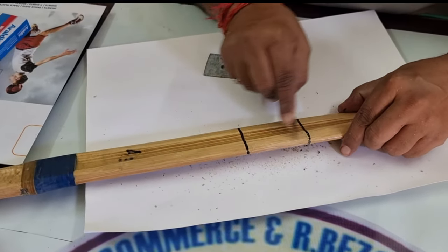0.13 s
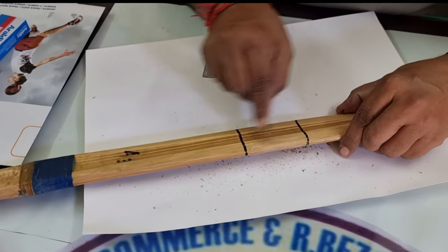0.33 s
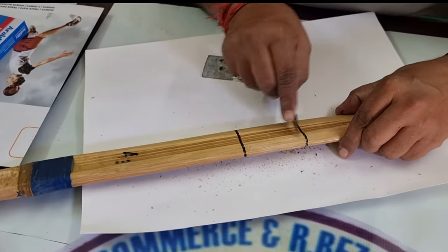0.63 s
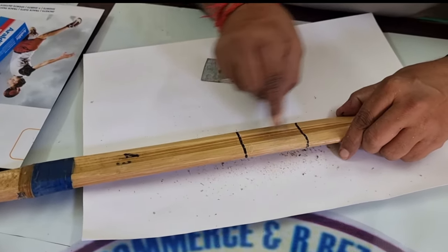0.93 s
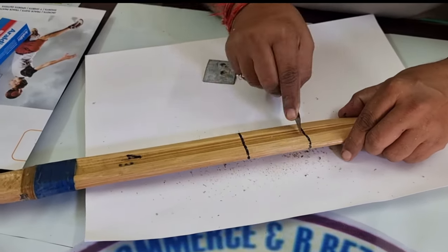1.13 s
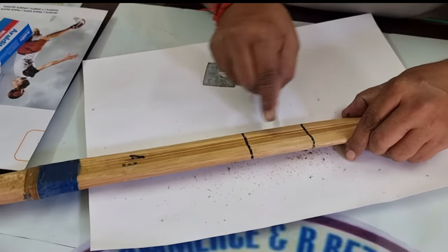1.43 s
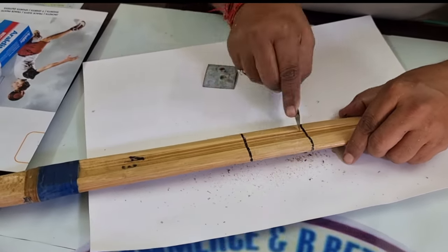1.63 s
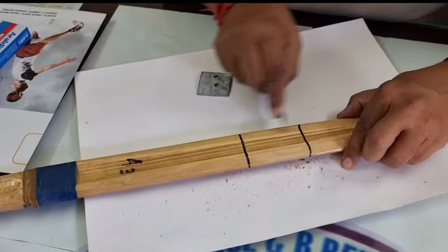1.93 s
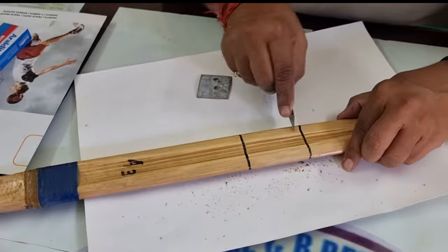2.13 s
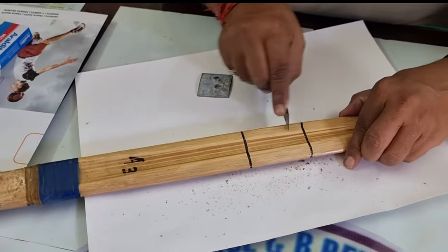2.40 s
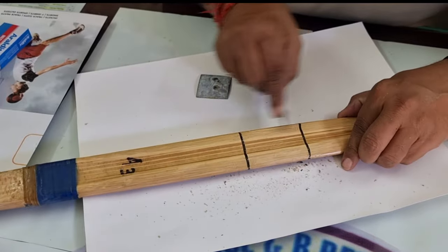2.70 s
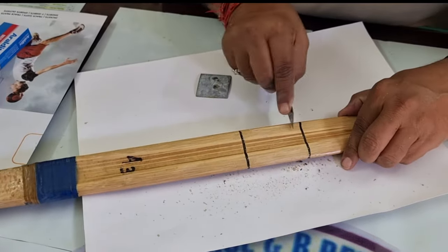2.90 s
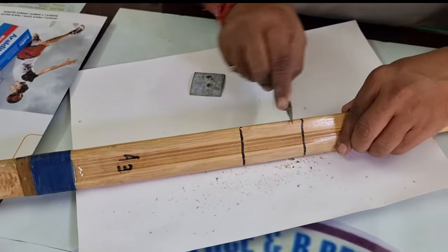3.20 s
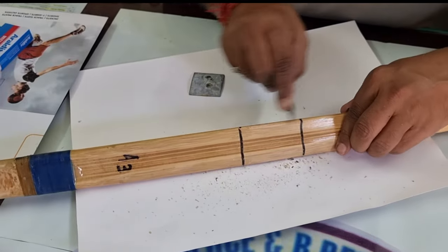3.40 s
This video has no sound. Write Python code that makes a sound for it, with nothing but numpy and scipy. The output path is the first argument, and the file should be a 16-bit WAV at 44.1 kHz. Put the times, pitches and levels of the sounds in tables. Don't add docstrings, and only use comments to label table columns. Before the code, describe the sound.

Close, dry rasping of a metal edge on bamboo, steady and rapid from start to end, each push stronger than the return, fading into light slides over faint room hiss and low desk rumble.

```python
import sys
import numpy as np
from scipy import signal
from scipy.fft import rfft, irfft
from scipy.io import wavfile
from scipy.ndimage import uniform_filter1d, minimum_filter1d

SR = 44100
rng = np.random.default_rng(int(sys.argv[2]) if len(sys.argv) > 2 else 0)


def ratio_of_db(decibels):
    return 10 ** (np.asarray(decibels, float) / 20)


def transcribe(u):
    v = np.clip(np.atleast_2d(u).T, -1, 1)
    q = np.round(v * 32767).astype(np.int16)
    wavfile.write(sys.argv[1], SR, q)


N = 156555

# freq_hz, level_db_per_hz
HUSH_SPECTRUM = [(25, -54), (55, -20.5), (152, -23.5), (243, -23), (359, -22.5), (2300, -23), (4420, -29.5),
                 (15500, -28.5)]
# start_s, length_s, flex_level_db, pressure_change_db, flex_pitch_hz
PUSHES = [(.098, 0.066, -41.5, 6.5, 2780), (.345, 0.062, -17, -4, 2790), (.589, 0.051, -18.5, 1, 2770),
          (.826, 0.065, -17.5, -1, 2740), (1.075, 0.056, -24, -1, 2780), (1.332, 0.052, -19.5, 8, 2833),
          (1.577, 0.047, -21, -2, 2780), (1.815, 0.069, -19, 16.5, 2680), (2.068, 0.067, -26.5, 10.5, 2735),
          (2.32, 0.07, -23.5, -8.5, 2900), (2.582, 0.057, -30, -4.5, 3000), (2.841, 0.056, -33, -1.5, 2940),
          (3.106, 0.045, -26.5, 13, 3115)]
PULLS = [(.022, 0.003, -41.5, -3, 2320), (.222, 0.058, -32, 18, 2301), (.478, 0.054, -34.5, 6, 2275),
         (.702, 0.07, -27.5, 9.5, 2380), (.955, 0.074, -36.5, -7.5, 2324), (1.168, 0.058, -44, 2, 2200),
         (1.452, 0.044, -41, 6.5, 2530), (1.68, 0.072, -32, 2, 2370), (1.927, 0.07, -32.5, 14.5, 2395),
         (2.212, 0.049, -36, 11.5, 2460), (2.448, 0.061, -25.5, 0, 2380), (2.706, 0.059, -31.5, 17.5, 2430),
         (2.965, 0.062, -44, 14.5, 2460), (3.212, 0.074, -37, 18, 2370)]
SLIDES = [
    (3.357, 0.065, -54, 3.5, 2460),
    (3.46, 0.035, -58, 2.9, 2500),
    (3.515, 0.049, -51.5, 19, 2370),
]
# thump_db, knock_db, tip_db, edge_db, thump_pitch_hz
PUSH_GRIPS = [(1.5, -2.5, -9.5, -2, 530), (-23.5, -12, -1, -5, 490), (-25, -16.5, -2.5, -5, 481),
              (-21, -15, -6, -11, 476), (-21, -9, -11.5, -5.5, 515), (-32.5, -8.5, -7, -6, 360),
              (-26, -10, -4, -2.5, 500), (-20, -7, -2, -4, 473), (-18.5, -6.5, 3.5, 1.5, 550),
              (-21, -9.5, 0.5, -3, 460), (-18.5, -2.5, -1, -2, 480), (-15.5, -3.5, -3.5, 3, 453),
              (-21, -13, -19.5, 0, 418)]
PULL_GRIPS = [(-17, -28, -16, -10, 510), (-24.5, -36.5, -7, -4, 410), (-32.5, -18.5, 0, -0.5, 2000),
              (-25.5, -26, -4, -8, 570), (-11.5, -36, -3, -3.5, 1800), (-22, -15, -5, -4.5, 1700),
              (-37, -16, -11, -31, 2000), (-34, -15.5, -7.5, -8, 280), (-25, -18.5, -11, -9.5, 240),
              (-46, -24, -3.5, 0, 800), (-49, -23, -3, -3.5, 390), (-29, -21, -2, 3.5, 360),
              (-23, -21, 5, 9, 2200), (-4, -32, 3, -6, 710)]
SLIDE_GRIPS = [
    (11.5, 13, 4.7, 18, 440),
    (-1, -28, 1.9, 2.5, 340),
    (-7, -5, 22, 25, 120),
]
# knock_change_db, tip_change_db, edge_change_db, spine_re_tip_db
PUSH_TILTS = [(9.5, -16, 16.5, -6), (3, -7, 6, 4.5), (12.5, 3, 4, 9), (3, 2, -1, 8), (2, -18.5, -12, 12),
              (1, -7.5, -2.5, 6), (12.5, 8, -8.5, 2), (8, -7, -19.5, 1), (10.5, 4, -4.5, 6.5),
              (13.5, -2.5, 5, 2), (1, -7.5, -3.5, -4), (11, 11.5, -3.5, 4.5), (21, 4.5, -13, 27)]
PULL_TILTS = [(-2, 7, -8.5, 1), (6, 13, -4, 5), (3, -8, -5, 1.5), (0, -6.5, -8, -3), (8, -6.5, -6.5, 1.5),
              (18, -6, 5.5, -7), (8, -5, 1, -4), (-2, -19.5, -7, 3.5), (-2, 8.5, 8, 2.5), (0, -7, -8, 11),
              (12, -7.5, -5, 1), (-0.5, -12, -10.5, 1), (4, -10.5, -14.5, -5.5), (17, -4, 0.5, -1)]
SLIDE_TILTS = [
    (-2.5, 5, 4.0, 15.5),
    (-14, 12.5, 9.0, 0.0),
    (13, 6.5, 5.0, 4.5),
]
PUSH_SHANKS = [-13, 1.5, 6.5, 4.5, -1.5, 7, 2.5, 4, 1.5, 1.5, -25, -38, -13]
PULL_SHANKS = [-1, 1.5, 5.5, 0.5, -9, -7, 16, -3.5, 2.5, 7, -2.5, -6, -10, 8]
# freq_hz, width_hz, level_db (freq_hz below 2: ratio to the stroke's pitch_hz)
PUSH_RINGS = [
    [(0.963, 73, 5), (962, 110, -8.5), (345, 160, -16.5)],
    [(0.9975, 302, 2), (2200, 530, -19)],
    [(1713, 116, 0), (1318, 142, -6)],
    [(3876, 370, -0.5), (4620, 1500, -8)],
    [(9620, 900, 6), (10560, 400, 1), (11960, 1500, -5.5), (14100, 2000, -50)],
    [(5726, 340, -14.5)],
    [(7610, 440, -8)],
]
PULL_RINGS = [
    [(1.024, 150, 2), (380, 90, -6), (983, 260, -1.5)],
    [(1.006, 222, 3), (2980, 330, -5.5)],
    [(1752, 110, 6.5), (1310, 370, 1.5)],
    [(3727, 540, 5.2), (4148, 310, 4.34)],
    [(10290, 790, 7.5), (12800, 630, -10.5), (13900, 1500, -81)],
    [(5804, 740, 0.87)],
    [(8300, 1300, -2)],
]
SLIDE_RINGS = [
    [(0.96, 160, 1.5), (820, 760, -4)],
    [(1, 2400, 0.0046)],
    [(1100, 730, 0)],
    [(3900, 350, -3)],
    [(8930, 1900, -9.5), (11900, 780, -2), (13500, 700, -9)],
    [(6160, 300, -8)],
    [],
]
# time_s, extra_force_db
CATCHES = [(.127, 6.5), (0.142, 8.5), (.168, 15), (0.224, 21.5), (0.246, 9), (.348, 7.5), (0.384, 7.5),
           (.399, 16.5), (.508, 5), (.528, -9.5), (.543, 9), (0.598, 6), (.616, 5.5), (0.63, 6.5),
           (0.643, 15), (.709, 2.5), (.721, 7), (0.764, -7.5), (.963, -11.5), (0.997, 20), (1.018, 8),
           (1.077, 1.5), (1.096, 7), (1.123, 3), (1.188, 13.5), (1.358, -0.5), (1.382, 6), (1.483, 19.5),
           (1.498, 16.5), (1.582, -9), (1.59, 11.5), (1.711, 9), (1.726, 16.5), (1.747, -4), (1.76, 10.5),
           (1.826, 15), (1.844, 17.5), (1.855, -8), (1.937, 17.5), (1.969, 12), (1.991, -2.5),
           (2.085, 12.5), (2.107, 10), (2.125, -4), (2.239, 6), (2.326, 2.5), (2.333, 1.5), (2.355, 11.5),
           (2.388, 17.5), (2.464, 0.5), (2.501, 3), (2.6, 3.5), (2.639, 15), (2.729, 17), (2.883, 11.5),
           (2.988, 21), (3.109, 1), (3.135, 11.5), (3.215, 11), (3.232, 19.5)]
CATCH_SHARES = (.3, 1, .4, .8, .35, .4, .4)

HUSH_DB, HUSH_S, HUSH_FOLLOW = -52, 0.054, 0.14
RUMBLE_DB, RUMBLE_HZ, RUMBLE_S, RUMBLE_FOLLOW = -68, 93, 0.081, 0.15
RUMBLE_SWELL_S, RUMBLE_SWELL_DB = 0.05, 7
WHINE_HZ, WHINE_DB, WHINE_ROOT_DB = 799.5, -89, -76
ROOM_DB, ROOM_T60_S, ROOM_HZ = -18, 0.13, 4500
LAND_DB_PER_S, CREEP_DB, CREEP_DB_PER_S = 2202.5, -28, 711
LIFT_DB_PER_S, DRAG_DB, DRAG_DB_PER_S = 1210.5, -38.5, 467.5
ROUND_S = 0.015
GRAINS_PER_S, GRAIN_SPREAD_DB = 10000, 2.7
CLUMP_S, CLUMP_DB = 0.0026, 1.5
PART_CLUMP_S, PART_CLUMP_DB = 0.006, 2.6
CATCH_RISE_S, CATCH_FALL_S = 0.002, 0.0036
RASP_DB, RASP_HZ, RASP_WIDTH_HZ = -14, 5000, 7000
BENT_HZ, BENT_RISE = 2935, 3.5
EDGE_EXTRA_STEEP, THUMP_LEAN_DB = 0.24, 6
DETUNE, RING_SCATTER_DB = 0.018, 2.97
WANDER, WANDER_S, TIP_SAG = 0.011, 0.025, 0.05


def evened(x):
    return x / np.sqrt(np.mean(x ** 2) + 1e-20)


def lumps(count, seconds):
    wide = max(round(seconds * SR), 2)
    once = uniform_filter1d(rng.standard_normal(count), wide)
    return evened(uniform_filter1d(once, wide))


def resonate(x, hz, width_hz):
    turn = np.exp(2j * np.pi * np.cumsum(hz * np.ones(len(x))) / SR)
    r = np.exp(-np.pi * 1.55 * width_hz / SR)
    gain = np.sqrt(2 * (1 - r * r) ** 3 / (1 + r * r))
    return (turn * signal.lfilter([gain], [1, -2 * r, r * r], x / turn)).real


def add(mix, start_s, sound):
    at = round(start_s * SR)
    part = mix[max(at, 0):max(at + len(sound), 0)]
    part += sound[max(-at, 0):][:len(part)]


def following(x, seconds, share):
    power = uniform_filter1d(x ** 2, round(seconds * SR)).clip(0)
    return (power / np.mean(x ** 2) + 1e-5) ** share


def hush(x):
    hz = np.fft.rfftfreq(N, 1 / SR)
    table_hz, table_db = np.transpose(HUSH_SPECTRUM)
    shape = ratio_of_db(np.interp(np.log(hz + 1), np.log(table_hz), table_db))
    noise = irfft(rfft(rng.standard_normal(N)) * shape, N)
    return ratio_of_db(HUSH_DB) * following(x, HUSH_S, HUSH_FOLLOW) * evened(noise)


def whine():
    phase = 2 * np.pi * WHINE_HZ * np.arange(N) / SR
    harmonics = sum(np.sin(k * phase + k * k) for k in range(4, 13))
    return ratio_of_db(WHINE_DB) * harmonics + ratio_of_db(WHINE_ROOT_DB) * np.sin(phase)


def rumble(x):
    shake = following(x, RUMBLE_S, RUMBLE_FOLLOW) * ratio_of_db(RUMBLE_SWELL_DB * lumps(N, RUMBLE_SWELL_S))
    return ratio_of_db(RUMBLE_DB) * evened(shake * resonate(rng.standard_normal(N), RUMBLE_HZ, 110))


def room(x):
    t = np.arange(SR // 3) / SR
    tail = signal.lfilter(*signal.butter(2, ROOM_HZ, fs=SR), rng.standard_normal(len(t)))
    tail = tail * ratio_of_db(-60 * t / ROOM_T60_S) * (t > 0.004)
    return ratio_of_db(ROOM_DB) * signal.fftconvolve(x, tail / np.linalg.norm(tail))[:N]


def catches(t):
    near = [c for c in CATCHES if t[0] < c[0] < t[-1]] or [(0, 0)]
    s, db = np.transpose(near)[:, :, None]
    distance = np.maximum((s - t) / CATCH_RISE_S, (t - s) / CATCH_FALL_S).clip(0, 9)
    return (db * np.exp(-distance ** 2)).sum(0)


def stroke_speed_db(t, length_s, lean_db, along):
    early, late = np.maximum(-t, 0), np.maximum(t - length_s, 0)
    land = np.maximum(-LAND_DB_PER_S * early, CREEP_DB - CREEP_DB_PER_S * early)
    lift = np.maximum(-LIFT_DB_PER_S * late, DRAG_DB - DRAG_DB_PER_S * late)
    return uniform_filter1d(land + lift + lean_db * along, round(ROUND_S * SR))


def tearing_fibres(count):
    chance, strength, sign, rub = rng.random((4, count))
    sizes = ratio_of_db(-GRAIN_SPREAD_DB * np.log(strength + 0.017))
    grains = (chance < GRAINS_PER_S / SR) * sizes * np.sign(sign - 0.5)
    return evened(evened(grains) + evened(rub - 0.5))


def stroke(start_s, length_s, level_db, lean_db, flex_hz, grip, tilt, shank_db, rings):
    t = np.arange(-0.07, 0.2, 1 / SR)
    count = len(t)
    along = np.clip(t / length_s, 0, 1) - 0.5
    speed_db = stroke_speed_db(t, length_s, lean_db, along)
    snag_db = catches(start_s + t)
    force = ratio_of_db(level_db + speed_db + CLUMP_DB * lumps(count, CLUMP_S))
    fibres = tearing_fibres(count)

    thump_db, knock_db, tip_db, edge_db, thump_hz = grip
    knock_tilt_db, tip_tilt_db, edge_tilt_db, spine_re_tip_db = tilt
    spine_db = tip_db + spine_re_tip_db
    tip_db = tip_db + tip_tilt_db * along
    edge_db = edge_db + edge_tilt_db * along + EDGE_EXTRA_STEEP * np.minimum(speed_db, 0)
    rasp = fibres * force * ratio_of_db(RASP_DB + (tip_db + edge_db) / 2)
    out = resonate(rasp, RASP_HZ, RASP_WIDTH_HZ)

    levels_db = (thump_db + THUMP_LEAN_DB * along, 0, knock_db + knock_tilt_db * along,
                 tip_db, edge_db, spine_db, edge_db + shank_db)
    bent_hz = flex_hz * (1 + BENT_RISE * max(flex_hz / BENT_HZ - 1, 0) * along)
    pitches_hz = (thump_hz, bent_hz, 1, 1, 1, 1, 1)
    sags = (0, 0, 0, TIP_SAG, 0, 0, 0)
    for db, pitch_hz, sag, share, part in zip(levels_db, pitches_hz, sags, CATCH_SHARES, rings):
        for hz, width_hz, ring_db in part:
            if hz < 2:
                ring_hz = hz * pitch_hz
            else:
                drift = DETUNE * rng.standard_normal() + WANDER * lumps(count, WANDER_S)
                ring_hz = hz * (1 - sag * along + drift)
            own_fibres = np.roll(fibres, rng.integers(count))
            chatter_db = PART_CLUMP_DB * lumps(count, PART_CLUMP_S)
            push = own_fibres * force * ratio_of_db(db + share * snag_db + chatter_db)
            scatter_db = RING_SCATTER_DB * 2 * (rng.random() - 1.09)
            out = out + ratio_of_db(ring_db + scatter_db) * resonate(push, ring_hz, width_hz)
    return start_s + t[0], out


def blade():
    out = np.zeros(N)
    kinds = ((PUSHES, PUSH_GRIPS, PUSH_TILTS, PUSH_SHANKS, PUSH_RINGS),
             (PULLS, PULL_GRIPS, PULL_TILTS, PULL_SHANKS, PULL_RINGS),
             (SLIDES, SLIDE_GRIPS, SLIDE_TILTS, np.zeros(len(SLIDES)), SLIDE_RINGS))
    for rows, grips, tilts, shanks, rings in kinds:
        for row, grip, tilt, shank_db in zip(rows, grips, tilts, shanks):
            add(out, *stroke(*row, grip, tilt, shank_db, rings))
    return signal.sosfilt(signal.butter(4, 280, "high", fs=SR, output="sos"), out)


def scene():
    x = blade()
    return (x + room(x) + hush(x) + rumble(x) + whine())[None]


def band_limit(x):
    return signal.sosfilt(signal.butter(12, 15850, fs=SR, output="sos"), x)


def record(dry):
    ceiling, top_hz = 0.9, 15400
    needed = ceiling / np.maximum(abs(dry), ceiling)
    gain = uniform_filter1d(minimum_filter1d(needed, 129), 128)
    lowpass = signal.firwin(255, top_hz, window=("kaiser", 9), fs=SR)
    mix = signal.oaconvolve(dry * gain, lowpass[None], "same")
    return band_limit(mix)


dry = scene()
out = record(dry)
transcribe(out)
```